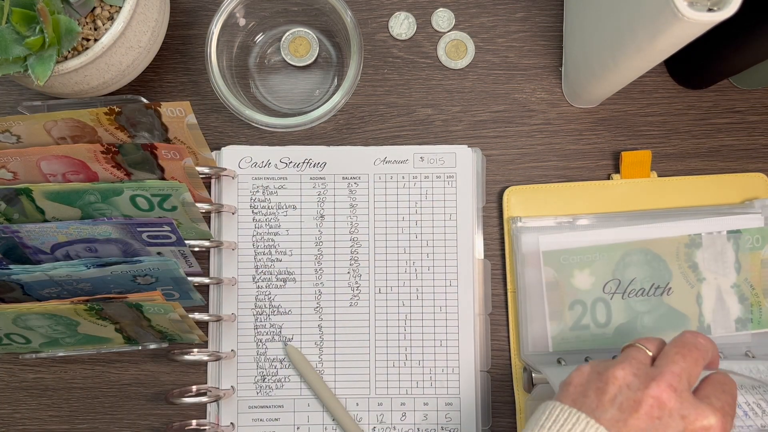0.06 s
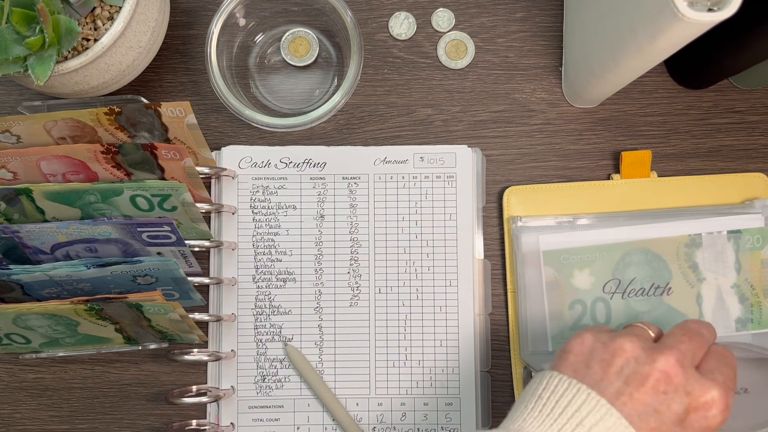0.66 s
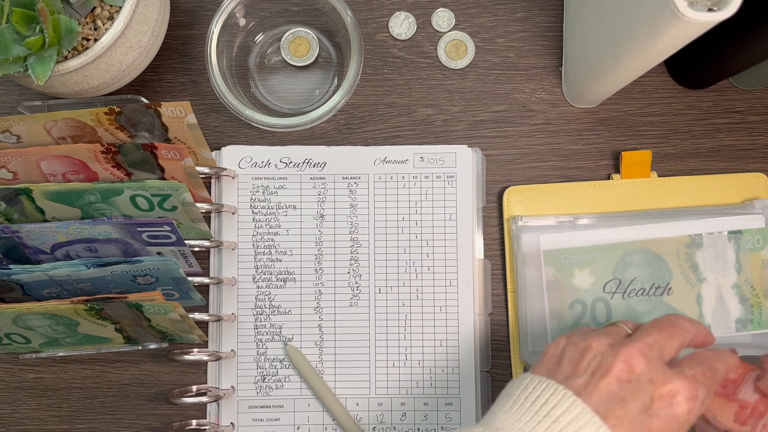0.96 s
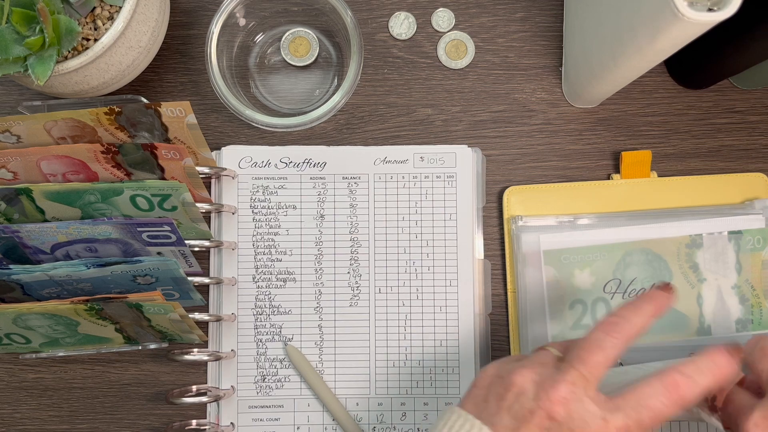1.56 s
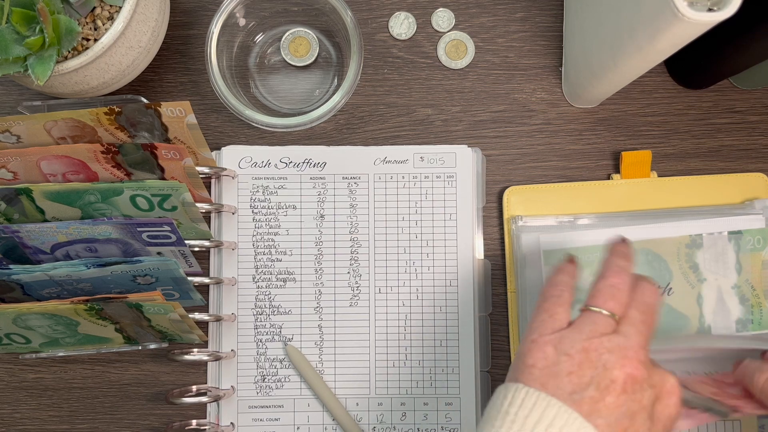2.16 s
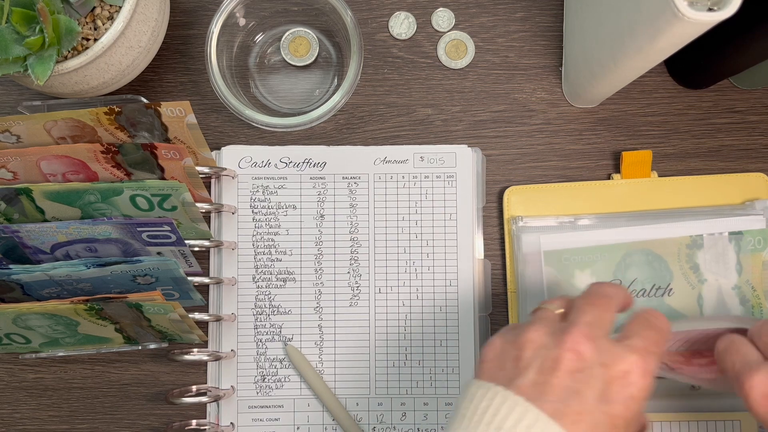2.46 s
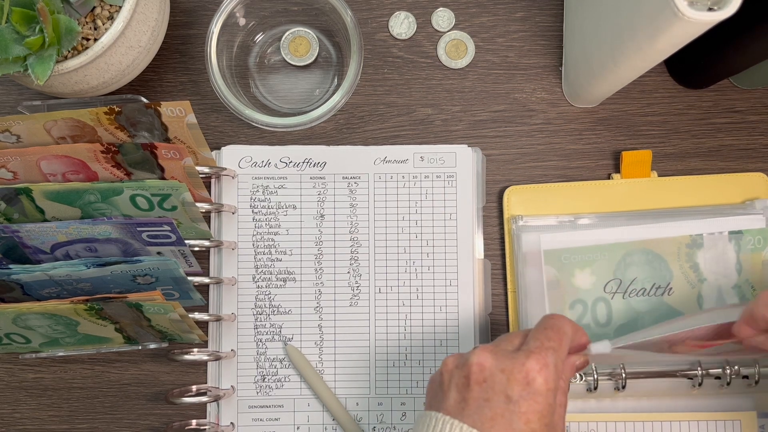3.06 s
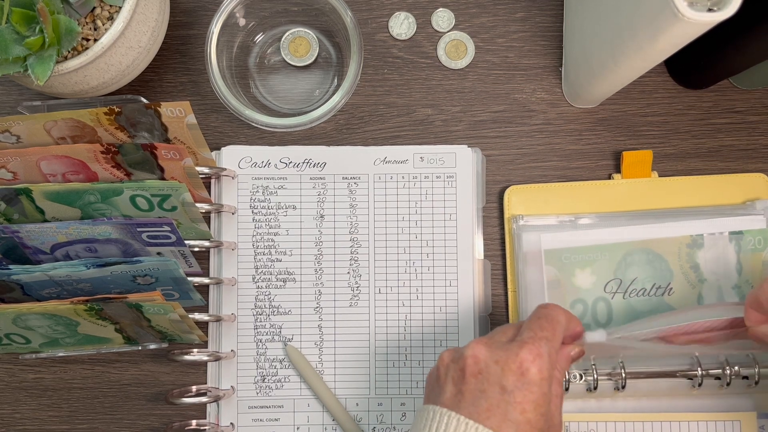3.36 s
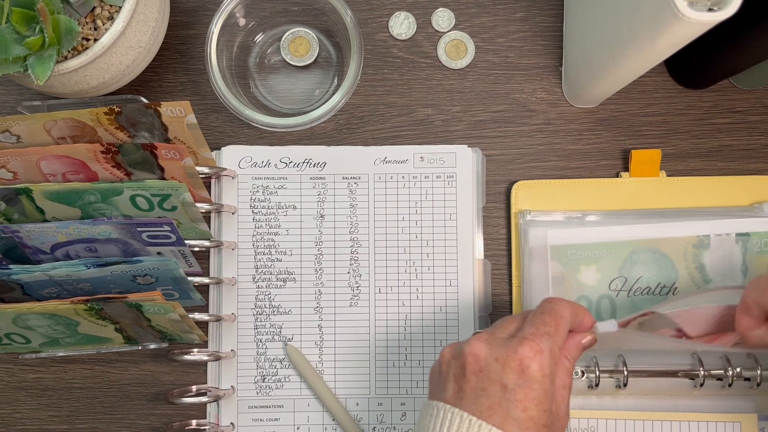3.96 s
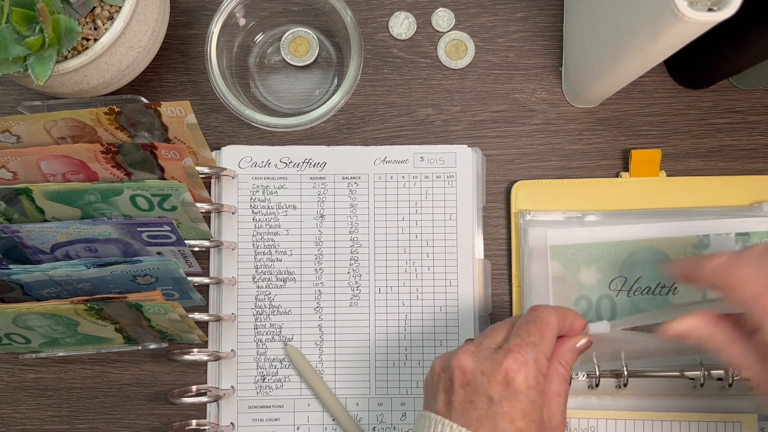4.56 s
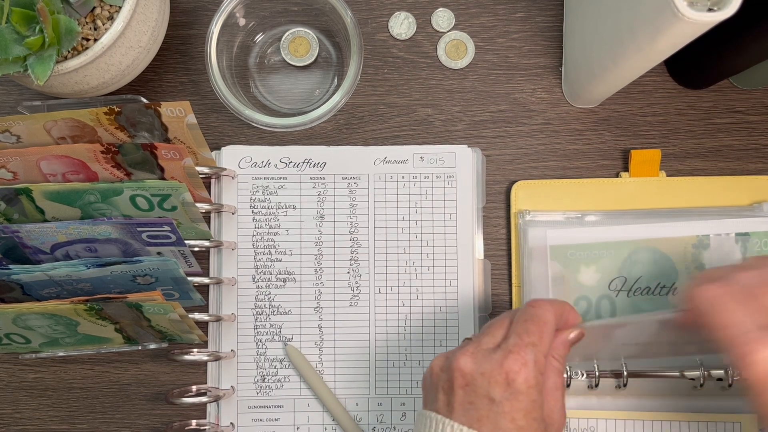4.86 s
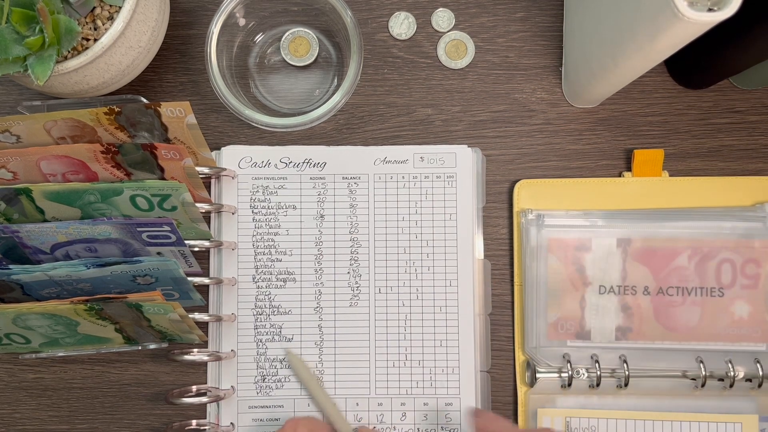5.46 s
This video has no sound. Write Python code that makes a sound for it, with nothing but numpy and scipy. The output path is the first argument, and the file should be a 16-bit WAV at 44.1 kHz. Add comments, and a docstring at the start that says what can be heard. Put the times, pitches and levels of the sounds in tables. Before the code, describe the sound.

Hands tuck banknotes into a ring binder's vinyl envelope. The plastic sheets crinkle and slide in short, uneven strokes, dotted with sharp snaps of creases and fingernails and hollow fingertip taps. The binder bumps softly on a wooden table. Near the end the vinyl squeaks faintly as the envelope is turned over, and the handling thins out. Two microphones hang close above the table in a small, quiet room.

```python
"""Plastic sheets rustle, tap and snap as hands tuck banknotes into a ring binder's vinyl envelope,
then turn the envelope over. The sheets bend, crinkle and slide, fingertips tap the hollow pocket,
and creases and fingernails snap. The binder bumps on the wooden table, and near the end vinyl
squeaks against vinyl. A small room answers; two microphones hang close together above the table."""
import sys
import numpy as np
from scipy import signal
from scipy.fft import rfft, irfft, next_fast_len
from scipy.io import wavfile
from scipy.ndimage import uniform_filter1d

SR = 44100
rng = np.random.default_rng(int(sys.argv[2]) if len(sys.argv) > 2 else 0)


def bounce(signal):
    """Save signal as a 16-bit WAV file at the path given by the first command-line argument."""
    frames = np.transpose(np.atleast_2d(signal))
    limited = np.clip(frames, -1, 1)
    pcm = np.round(limited * 32767).astype(np.int16)
    wavfile.write(sys.argv[1], SR, pcm)


N = 243088
TIME = np.arange(N) / SR
FFT_SIZE = next_fast_len(N + SR)
FREQ = np.maximum(np.fft.rfftfreq(FFT_SIZE, 1 / SR), 1)

# Finger strokes over notes and vinyl. Each row: start and length in seconds, then how strongly the
# sheets bend, crinkle and slide, each in dB.
FINGER_STROKES = [(0.0, 0.0047, -51, -46, -86), (0.12, 0.059, -72, -61, -64),
                  (0.291, 0.023, -62.5, -53.5, -60), (0.487, 0.094, -58, -55, -59),
                  (0.627, 0.096, -65, -69, -92), (0.817, 0.041, -64, -56.5, -55.5),
                  (0.859, 0.054, -53, -50, -47.5), (0.92, 0.14, -65.5, -56.5, -57.5),
                  (1.062, 0.057, -55.5, -52.5, -45), (1.124, 0.047, -60.5, -52.5, -49.5),
                  (1.186, 0.058, -69, -56.5, -50.5), (1.356, 0.086, -63, -55.5, -49.5),
                  (1.457, 0.059, -76, -68, -54), (1.573, 0.072, -78.5, -68, -56.5),
                  (1.683, 0.087, -67, -59.5, -55.5), (1.877, 0.12, -64, -60, -53.5),
                  (2.011, 0.17, -64.5, -58, -52), (2.29, .1, -57, -56, -52.5),
                  (2.509, 0.061, -55, -62, -59.5), (2.641, 0.088, -63, -56.5, -52.5),
                  (2.778, 0.041, -57, -54.5, -50.5), (2.906, 0.044, -64.5, -56.5, -62),
                  (3.01, 0.06, -64, -63, -56.5), (3.145, 0.042, -68, -56.5, -57.5),
                  (3.222, 0.034, -56.5, -63, -63), (3.351, 0.038, -64, -71, -54.5),
                  (3.469, 0.063, -54.5, -48.5, -46), (3.578, 0.082, -66, -52.5, -51),
                  (3.657, 0.052, -64, -73, -54.5), (3.824, 0.12, -66, -59, -55.5),
                  (3.924, 0.074, -68, -54, -49), (4.047, 0.074, -69, -62.5, -57.5),
                  (4.181, 0.098, -90, -60.5, -59.5), (4.318, 0.027, -66, -57, -54),
                  (4.448, 0.063, -66, -59, -60.5), (4.788, 0.11, -73.5, -67.5, -58.5),
                  (4.884, 0.07, -71.5, -81, -56), (5.075, 0.089, -73, -67, -72),
                  (5.207, 0.033, -70, -60, -54), (5.372, 0.096, -99, -82, -70.5)]
# Faint rustle of the held envelope. Each row: time in seconds, level in dB.
HOLDING_LEVEL = [(0, -69), (.55, -73), (.785, -82), (1.0, -71), (1.6, -69), (1.84, -74.5), (2.05, -62.5),
                 (2.6, -62), (3.0, -73), (3.44, -63.5), (3.55, -67), (4.45, -71), (4.6, -100), (4.78, -75),
                 (5.0, -70), (5.3, -100)]
# The dB added to that level for bending, crinkling and sliding.
HOLDING_MIX_DB = [-11, 1, -0.5]
# The pitches in Hz around which creases of different sizes crinkle.
CREASE_PITCHES = [600, 1100, 1500, 2000, 2700, 3600, 4800]
# The tone of bending, crinkling and sliding sheets. Each row: frequency in Hz, boost or cut in dB.
BEND_SPECTRUM = [(25, -23), (55, 1.5), (125, -2), (200, -7.5), (340, -4), (560, -6.5), (850, -11.5),
                 (1800, -46)]
CRINKLE_SPECTRUM = [(300, -5), (700, -11), (1000, -1.5), (1500, 1.5), (2100, 0), (3000, -1), (4300, -12),
                    (5400, -3), (7000, -85), (15000, -40)]
SLIDE_SPECTRUM = [(1200, -35), (2800, 9.5), (4300, 7), (5400, 3), (6500, 7), (8500, 6), (12000, 7),
                  (14000, 5), (16000, -44.5)]
# Fingertip taps. Each row: start in seconds, level in dB, main pitch in Hz, brightness in dB per octave.
FINGER_TAPS = [(0.0711, -48.5, 1200, -4), (0.428, -32, 1620, -7.5), (0.9925, -36, 1250, 3),
               (2.216, -40.5, 1510, -3), (2.517, -45.5, 1630, -1), (2.5258, -35.5, 1557, -8.5),
               (3.355, -39.5, 1440, 5), (4.3326, -49.5, 1450, -2), (4.4377, -47, 1660, -3),
               (4.479, -41.5, 1700, 4)]
# The pocket's ringing tones. Each row: multiple of the main pitch, level in dB, fade time in seconds.
POCKET_TONES = [(0.34, -15.5, 0.031), (0.679, -10, 0.0084), (0.879, 1, 0.016), (1.001, -2.5, 0.025),
                (1.3, -6, 0.009), (1.53, 1.5, 0.008), (1.851, -0.5, 0.015)]
# Snaps of creases, nails and binder. Each row: time in seconds, level in dB, brightness in dB per
# octave, ringing pitch in Hz, base fade time in seconds.
SNAP_EVENTS = [(0.1956, -48.5, -2.5, 2250, 0.012), (0.2992, -61, -3, 1700, 0.016),
               (0.3685, -44, 3.5, 11100, 0.013), (0.379, -38, 2, 3170, 0.075), (.387, -24, 2, 2520, 0.012),
               (0.39, -25.5, -2, 3360, 0.0083), (.393, -36, 3.5, 3230, 0.21),
               (0.408, -35, -3.5, 3280, 0.13), (0.624, -50, -5, 1460, 0.0048),
               (0.6965, -66, -7, 1440, 0.017), (0.724, -59, 1, 3670, 0.017),
               (0.742, -60.5, -6.5, 1370, 0.014), (0.8274, -58, -10, 643, 0.023),
               (0.8415, -49, -9.5, 1710, 0.11), (0.9315, -54.5, -9.5, 1500, 0.022),
               (0.9877, -44, -5, 1930, 0.0066), (.991, -28.5, 2.5, 1500, 0.0038),
               (1.0728, -38.5, -1, 1080, 0.0063), (1.0844, -32, -1, 3420, 0.0095),
               (1.237, -44.5, 1.5, 4700, 0.013), (1.3489, -49.5, 3, 2000, 0.15),
               (1.421, -37.5, 2.5, 2250, 0.013), (1.5918, -52.5, 5, 1600, 0.015),
               (1.8521, -57.5, -4, 3160, 0.044), (1.9215, -52.5, -2, 1515, 0.025),
               (1.993, -55, -2.5, 1110, 0.017), (2.0362, -45, 8.5, 3500, 0.071),
               (2.1595, -37, 5.5, 2960, 0.0081), (2.2141, -43, 5.5, 12700, 0.016),
               (2.3062, -40.5, 2, 3200, 0.051), (2.345, -51, -9, 3450, 0.027),
               (2.368, -42.5, -4, 3220, 0.03), (2.46, -46.5, 0, 1570, 0.021),
               (2.4742, -46.5, -4.5, 1480, 0.052), (2.667, -47, -4.5, 1910, 0.007),
               (2.788, -42, -1.5, 1240, 0.013), (2.812, -45, -0.5, 1900, 0.0028),
               (3.0223, -41, 2, 3850, 0.008), (3.034, -52, 5, 3900, 0.045), (3.059, -60, 9, 4000, 0.008),
               (3.178, -49.5, 1, 2510, 0.018), (3.202, -34.5, 5, 2500, 0.0063),
               (3.241, -47.5, 4, 1080, 0.029), (3.327, -32, 2, 2780, 0.0043), (3.337, -45, 6, 4000, 0.048),
               (3.4876, -38.5, 3.5, 2500, 0.0037), (3.497, -39.5, 2, 1260, 0.026),
               (3.5109, -39, -5, 1870, 0.002), (3.532, -47, 3, 2620, 0.025), (3.542, -44.5, 0, 1680, 0.018),
               (3.566, -44.5, -2, 4530, 0.03), (3.603, -49, -3, 2060, 0.0099),
               (3.6878, -47, 4, 2700, 0.015), (3.696, -46, -4, 1950, 0.027), (3.708, -42, 4, 2870, 0.025),
               (3.7858, -53, -1.5, 1490, 0.015), (3.8066, -54, -2, 1380, 0.01),
               (3.85, -54, 2.5, 2060, 0.0043), (3.904, -50.5, 5, 1490, 0.0049),
               (3.923, -51.5, -2, 1210, 0.0046), (3.988, -49.5, 9, 2190, 0.023),
               (3.995, -45, -2, 1590, 0.009), (4.008, -51.5, -4, 1430, 0.017),
               (4.069, -50, -2, 1380, 0.011), (4.082, -45, 0.5, 1810, 0.0061), (4.224, -59, 8, 1500, 0.012),
               (4.273, -55, -2, 1800, 0.01), (4.457, -70.5, 16.5, 11500, 0.0059),
               (4.4807, -50, 4.5, 2570, 0.0071), (4.493, -50.5, -5, 1630, 0.03),
               (4.513, -52, -7.5, 1440, 0.026), (4.69, -62, -3, 1650, 0.015),
               (4.796, -60.5, -8.5, 2750, 0.022), (4.944, -58, -6.5, 1490, 0.058),
               (4.9731, -58, 10, 8350, 0.016), (5.0702, -60, -3, 2820, 0.006),
               (5.109, -57.5, -3.5, 2870, 0.022), (5.219, -44, 11, 6030, 0.0022),
               (5.2278, -61, -1, 5550, 0.005), (5.245, -58.5, -8, 1370, 0.018),
               (5.375, -67.5, 9, 2420, 0.0071), (5.435, -65.5, 7, 8500, 0.021)]
# A snap's four ranges. Each row: low and high edge in Hz, multiple of the base fade time, added dB.
SNAP_RANGES = [(251, 727, 3.5, -14.5), (824, 2420, 0.52, -2.5), (1930, 6900, 1.08, -1.5),
               (5300, 11700, 1.2, -11)]
# Soft bumps of hand and binder on the table. Each row: start in seconds, peak in dB, middle pitch in Hz.
TABLE_BUMPS = [(0.3894, -40, 415), (0.391, -42.5, 160), (.434, -42, 143), (.573, -53, 109),
               (0.623, -49.5, 84), (.825, -40.5, 450), (0.839, -40, 337), (0.853, -41.5, 384),
               (0.842, -58, 125), (0.99, -34, 503), (1, -44.5, 117), (1.078, -50.5, 124),
               (1.851, -52.5, 376), (2.048, -57, 120), (2.407, -48.5, 102), (2.531, -53, 101),
               (2.937, -52, 345), (2.966, -50.5, 135), (3.06, -51.5, 177), (3.206, -45.5, 129),
               (3.242, -47.5, 124), (3.243, -46, 407), (3.504, -41.5, 110), (3.507, -44, 360),
               (3.566, -44.5, 332), (3.691, -59, 137), (4.101, -55.5, 121), (4.994, -57, 88.5),
               (5.376, -53, 111), (5.378, -55.5, 263)]
# Knocks that set the table top or binder cover ringing. Each row: start in seconds, level in dB,
# pitch in Hz, fade time in seconds.
RINGING_KNOCKS = [(3.238, -53, 57.8, 0.62), (4.514, -47.5, 406, 0.2)]
# Vinyl rubbing on vinyl. Each row: start and length in seconds, first, middle and last pitch in Hz,
# level in dB, dB added for the tone an octave higher.
VINYL_SQUEAKS = [(4.802, 0.062, 1950, 2310, 2340, -65.5, -20), (4.83, 0.024, 1130, 1190, 1280, -63.5, -12),
                 (4.838, 0.056, 3150, 3300, 3300, -65, -20), (4.854, 0.032, 1300, 1335, 1310, -64, 9),
                 (4.886, 0.032, 1260, 1220, 1215, -65.5, -5), (4.888, 0.036, 3120, 3040, 2970, -64, -20)]
# The room's steady background noise. Each row: frequency in Hz, boost or cut in dB.
ROOM_SPECTRUM = [(25, -8), (55, 9), (120, 4), (300, 1), (650, -6), (1000, -8), (3000, -20), (8000, -24),
                 (16000, -22)]
# How far the wave lags at the farther microphone. Each row: frequency in Hz, lag in radians.
MIC_LAG = [(20, 0), (700, -.6), (1300, 0), (1900, .4), (2500, 1.9), (3000, 3), (3800, 1.6), (4600, .3),
           (5200, .9), (6000, 3.1), (8100, 6.3), (10300, 9.4), (12500, 12.6), (14600, 15.7), (17000, 19)]
# How much each microphone hears of the room's other side. Each row: frequency in Hz, share in dB.
MIC_SHARE = [(80, -4), (300, -18), (1500, -9), (3000, -22), (4800, -18), (5900, 0)]
# Stereo balance. Each row: frequency in Hz, right level minus left level in dB.
MIC_BALANCE = [(400, -.5), (1700, 0), (2600, 3.8), (4500, 3.5), (5500, -2.5), (6000, 0)]


def undb(db):
    """Turn decibels into a number to multiply by."""
    return 10 ** (np.asarray(db) / 20)


def unit(x):
    """Scale a signal to an average power of 1."""
    return x / np.sqrt(np.mean(x ** 2))


def contour(points):
    """Join (Hz, value) points with straight lines, giving every octave equal space."""
    hz, value = np.transpose(points)
    return np.interp(np.log(FREQ), np.log(hz), value)


def colour(x, points):
    """Boost and cut a sound's frequencies, then scale it to power 1."""
    return unit(irfft(rfft(x, FFT_SIZE) * undb(contour(points)), FFT_SIZE)[:N])


def band(x, low_hz, high_hz, order=2):
    """Keep the frequencies between two edges."""
    return signal.sosfilt(signal.butter(order, [low_hz, high_hz], "band", fs=SR, output="sos"), x)


def fade(t, t60):
    """Die away by 60 dB in t60 seconds, the fade time."""
    return np.exp(-np.log(1000) * t / t60)


def add(out, start, x):
    """Mix a short sound in at a start time in seconds."""
    i = max(int(start * SR), 0)
    out[i:i + len(x)] += x[:max(N - i, 0)]


def hit_level(x, db):
    """Give a hit as much energy as 4 ms of steady sound at this level."""
    return x * undb(db) / np.sqrt(np.sum(x ** 2) / (SR // 250))


def wander(rate):
    """Glide to a new random value, rate times a second."""
    step = int(SR / rate)
    stairs = np.repeat(rng.standard_normal(N)[:N // step + 1], step)
    return unit(uniform_filter1d(stairs, step)[:N])


def grains(rate, spread_db, t60):
    """Tiny slips, about rate a second, a few stronger than most, each with a short rattle."""
    size = undb(spread_db * np.minimum(rng.exponential(size=N), 4))
    slips = (rng.random(N) < rate / SR) * size * rng.choice([-1, 1], N)
    energy = signal.fftconvolve(slips ** 2, fade(TIME[:SR // 50], t60) ** 2)[:N]
    return unit(np.sqrt(np.maximum(energy, 0)) * rng.standard_normal(N))


def stroke(start, length, rise_s=0.013, swell_db=2.5, release_t60=0.051):
    """A finger takes hold, presses harder as it goes and lets go."""
    t = TIME - start
    swell = undb(swell_db * (np.clip(t / length, 0, 1) - 1))
    return np.clip(t / rise_s, 0, 1) * swell * fade(np.clip(t - length, 0, 1), release_t60)


def handling():
    """How strongly the sheets bend, crinkle and slide: the strokes, on top of the holding hand."""
    holding_db = np.interp(TIME, *np.transpose(HOLDING_LEVEL))
    power = np.outer(undb(HOLDING_MIX_DB), undb(holding_db)) ** 2
    for start, length, *db in FINGER_STROKES:
        power += np.outer(undb(db) ** 2, stroke(start, length) ** 2)
    return np.sqrt(power)


def crinkles():
    """Creases of each size give way at their own moments, so every crinkle has its own tone."""
    out = np.zeros(N)
    for hz in CREASE_PITCHES:
        crackle = band(grains(rate=150, spread_db=2.6, t60=0.01), hz / 1.3, hz * 1.3)
        out += unit(crackle) * np.sqrt(hz) * undb(wander(rate=14))
    return out


def rustle(bend_db=2, crinkle_db=-2, slide_db=-1, tick_db=-16):
    """Sheets bend with a low flutter, crinkle in separate grains and hiss as they slide together."""
    bend, crinkle, slide = handling()
    grip_db = 1.5 * wander(rate=68)  # the fingers' grip catches and lets go
    flutter = colour(grains(rate=410, spread_db=1.5, t60=0.03), BEND_SPECTRUM)
    crackle = colour(crinkles(), CRINKLE_SPECTRUM)
    # so many slips blur into a smooth swish
    swish = colour(grains(rate=3600, spread_db=0.9, t60=0.005), SLIDE_SPECTRUM)
    # small creases tick on their own
    ticks = unit(band(grains(rate=100, spread_db=4, t60=0.007), 1300, 11000, order=1))
    return (flutter * bend * undb(bend_db)
            + crackle * crinkle * undb(crinkle_db + grip_db)
            + swish * slide * undb(slide_db + grip_db)
            + ticks * crinkle * undb(tick_db))


def taps(contact_db=-11, contact_t60=0.01):
    """A fingertip ticks on the vinyl and the pocket answers with a short hollow ring."""
    out, t = np.zeros(N), TIME[:SR // 16]
    for start, db, hz, brightness in FINGER_TAPS:
        ring = np.zeros(len(t))
        for ratio, tone_db, t60 in POCKET_TONES:
            tone = np.sin(2 * np.pi * (hz * ratio * t + rng.uniform(-0.21, 0.45)))
            ring += undb(tone_db + brightness * np.log2(ratio)) * fade(t, t60) * tone
        tick = band(rng.standard_normal(len(t)) * fade(t, contact_t60), 300, 11000, order=1)
        tap = band(ring + undb(contact_db) * tick, 250, 14000)
        add(out, start, hit_level(tap, db))
    return out


def snaps(crack=4.12, creak_db=-16, creak_t60=0.008, ring_db=11.5, pivot_hz=2220):
    """A crease creaks under strain, then flips with one sharp crack that quickly dies away."""
    out, t = np.zeros(N), TIME[:SR // 16]
    for when, db, brightness, ring_hz, t60 in SNAP_EVENTS:
        for low_hz, high_hz, stretch, range_db in SNAP_RANGES:
            flip = rng.standard_normal(len(t)) * fade(t, t60 * stretch)
            flip[0] += crack
            creak = rng.standard_normal(len(t)) * fade(t, creak_t60)[::-1] * undb(creak_db)
            snap = np.concatenate([creak, flip])
            # the patch that flips rings at a pitch of its own
            snap += undb(ring_db) * band(snap, ring_hz / 1.11, ring_hz * 1.11, order=1)
            tilt_db = brightness * np.log2(np.sqrt(low_hz * high_hz) / pivot_hz)
            snap = hit_level(band(snap, low_hz, high_hz), db + range_db + tilt_db)
            add(out, when - len(t) / SR, snap)  # start early so the crack lands on time
    return out


def bumps(t60=0.053):
    """A padded blow sets binder and table top thudding, without a clear pitch."""
    out, t = np.zeros(N), TIME[:SR // 5]
    for start, db, hz in TABLE_BUMPS:
        thud = band(rng.standard_normal(len(t)) * fade(t, t60), hz / 1.6, hz * 1.6, order=3)
        add(out, start, thud * undb(db) / np.abs(thud).max())
    return out


def knocks(flutter=0.052, throb_db=3):
    """Table top or cover rings on one low note; the loose vinyl lying on it makes it flutter."""
    out, t = np.zeros(N), TIME[:SR // 2]
    for start, db, hz, t60 in RINGING_KNOCKS:
        pitch = hz * (1 + flutter * wander(rate=138)[:len(t)])
        phase = 2 * np.pi * np.cumsum(pitch) / SR
        level = undb(db + throb_db * wander(rate=86)[:len(t)])
        rise = np.clip(t * hz / 2, 0, 1)  # builds up over two swings
        add(out, start, level * rise * fade(t, t60) * np.sin(phase))
    return out


def squeaks(waver=0.017, rough_db=4):
    """Vinyl catches and slips at a wavering rate that rises and falls with the pull."""
    out = np.zeros(N)
    for start, length, *pitches, db, octave_db in VINYL_SQUEAKS:
        progress = np.linspace(0, 1, int(length * SR))
        glide = np.polyval(np.polyfit([0, 0.5, 1], pitches, 2), progress)
        hz = glide * (1 + waver * wander(rate=340)[:len(progress)])
        phase = 2 * np.pi * np.cumsum(hz) / SR
        level = undb(db + rough_db * wander(rate=260)[:len(progress)])
        arch = np.sqrt(4 * progress * (1 - progress))
        add(out, start, level * arch * (np.sin(phase) + undb(octave_db) * np.sin(2 * phase)))
    return out


def room(x, early_db=-4.5, late_db=-4, treble_db=-32, early_t60=0.023, wall_t60=0.34):
    """Sound bounces quickly off the table and the things on it, then lingers between the walls."""
    t = TIME[:SR // 2]
    noise = rng.standard_normal((3, len(t)))
    # small things nearby reflect no bass
    early = band(unit(noise[0] * fade(t, early_t60) * (t > 0.0015)), 430, 7800) * undb(early_db)
    tail = np.clip(t / 0.0047, 0, 1) * fade(t, wall_t60)
    late = band(unit(noise[1] * tail), 140, 7750) * undb(late_db)
    treble = band(unit(noise[2] * tail), 4800, 19000) * undb(treble_db)
    return signal.fftconvolve(x, (early + late + treble) / np.sqrt(len(t)))[:N]


def microphones(direct, left, right):
    """Each side's sound reaches the farther microphone a little later; both hear the hands."""
    direct, left, right = (rfft(x, FFT_SIZE) for x in (direct, left, right))
    lag = np.exp(-1j * np.interp(FREQ, *np.transpose(MIC_LAG)))
    share, tilt = undb(contour(MIC_SHARE)), undb(contour(MIC_BALANCE) / 2)
    total = np.sqrt(1 + share ** 2)  # sharing must not make the room louder
    at_left = direct + (left + share * lag * right) / total
    at_right = direct * lag + (right + share * lag * left) / total
    return irfft(np.array([at_left / tilt, at_right * tilt]), FFT_SIZE)[:, :N]


def scene(background_db=-72.5, hit_echo_db=-1.2, rub_echo_db=3):
    """All the handling in a quiet room; hits and rubs reach the walls from different places."""
    hits = snaps() + taps() + knocks() + squeaks()
    rubs = bumps() + rustle()
    sides = []
    for _ in range(2):
        echo = room(hits * undb(hit_echo_db)) + room(rubs * undb(rub_echo_db))
        background = undb(background_db) * colour(rng.standard_normal(N), ROOM_SPECTRUM)
        sides.append(echo + background)
    return microphones(hits + rubs, *sides)


def record(dry, top_hz=16200):
    """Cut away the very highest treble."""
    return signal.sosfilt(signal.ellip(10, 0.2, 80, top_hz, fs=SR, output="sos"), dry)


dry = scene()
out = record(dry)
bounce(out)
```